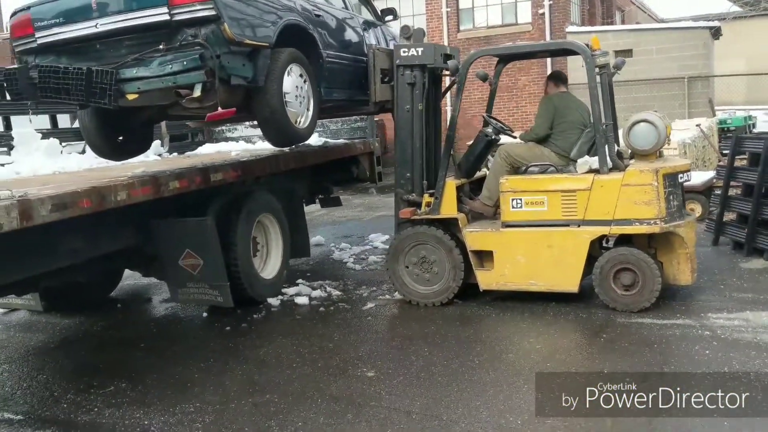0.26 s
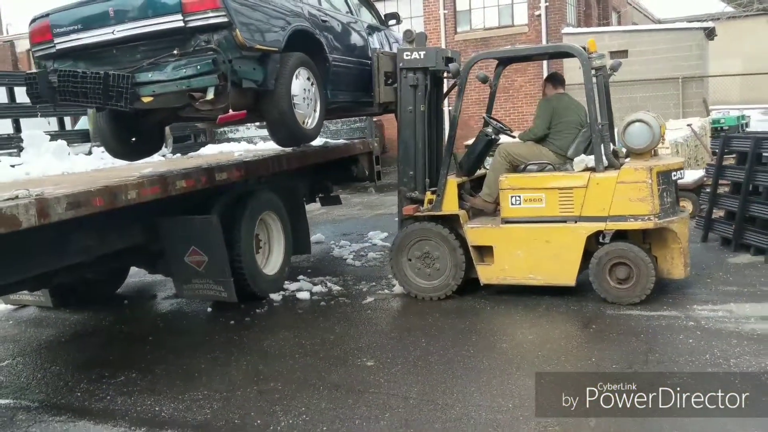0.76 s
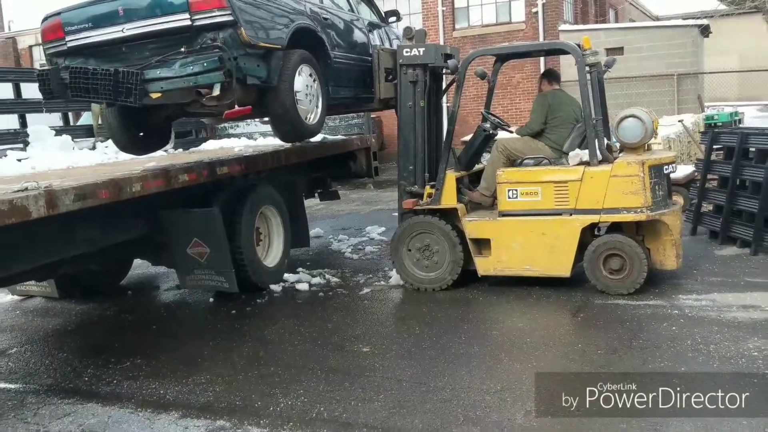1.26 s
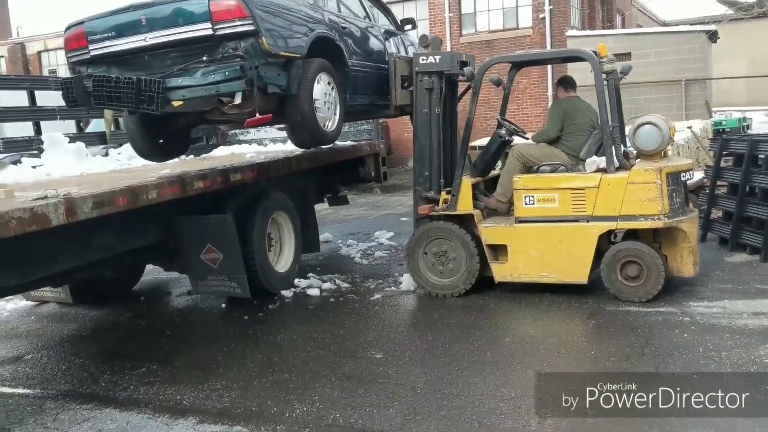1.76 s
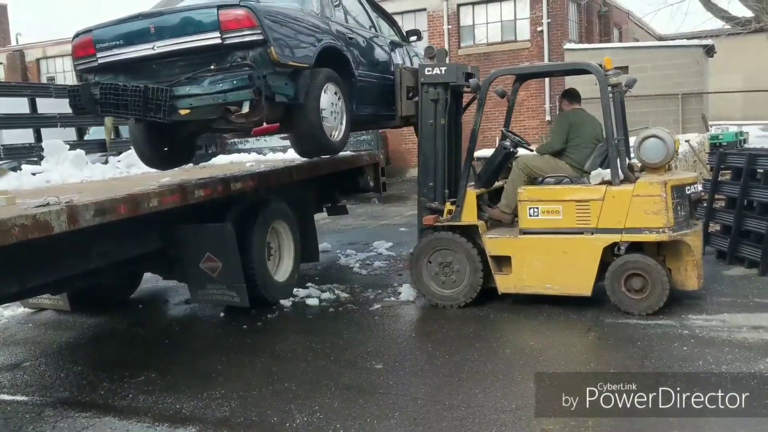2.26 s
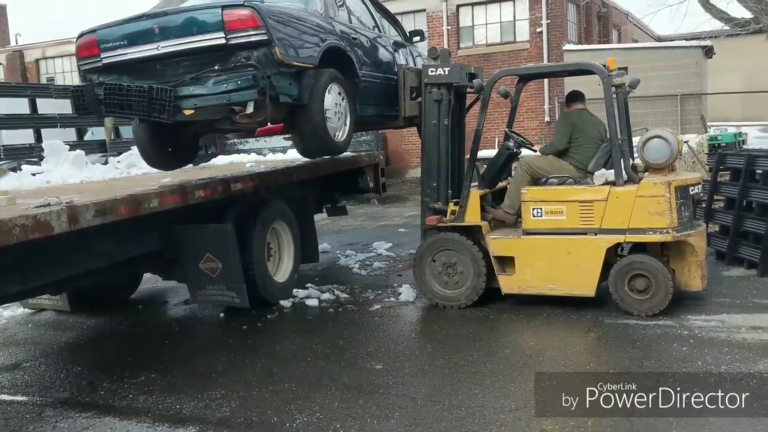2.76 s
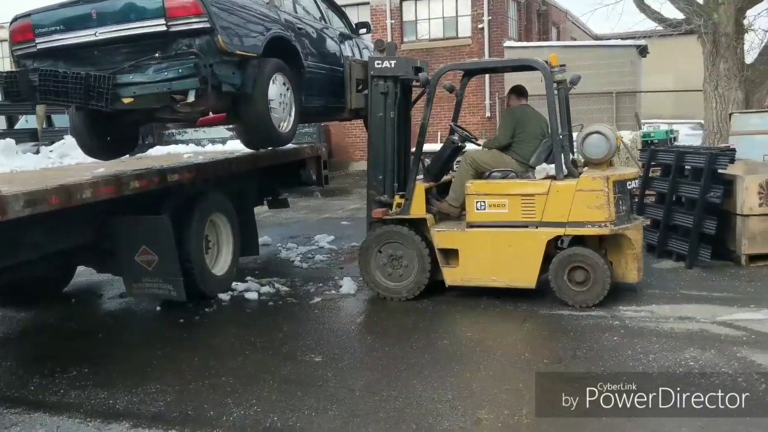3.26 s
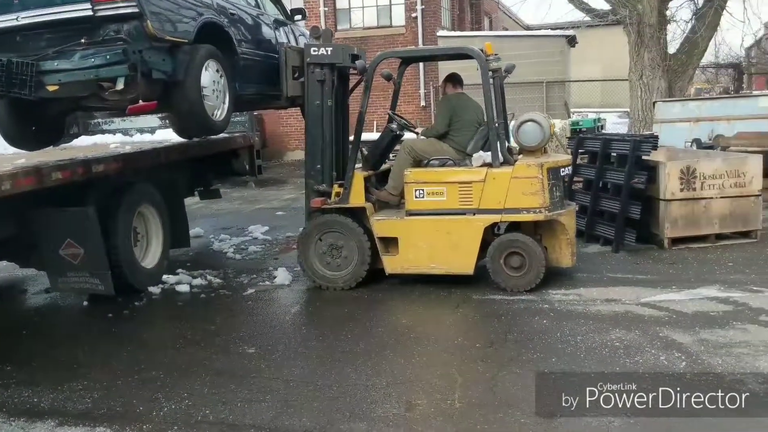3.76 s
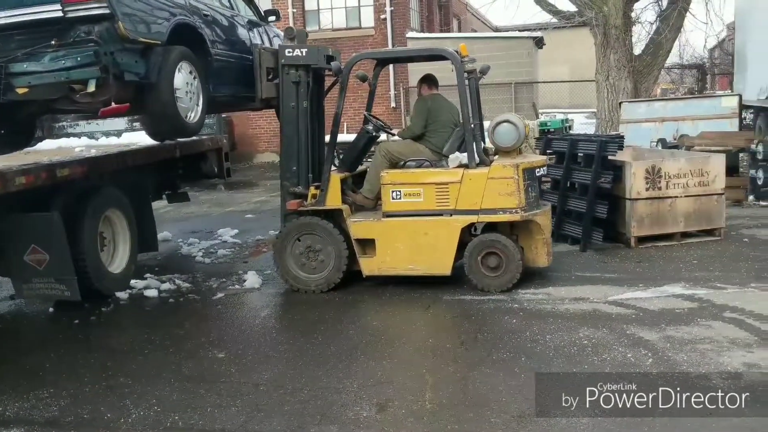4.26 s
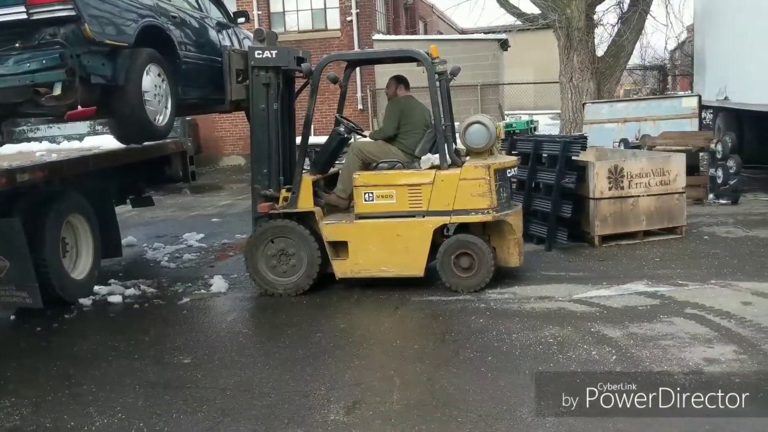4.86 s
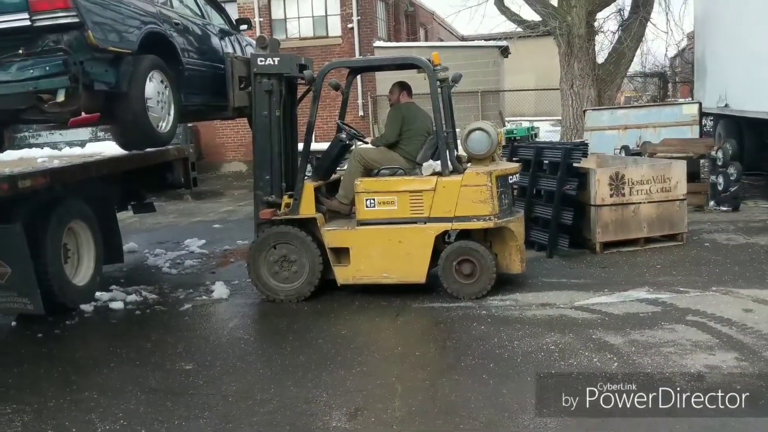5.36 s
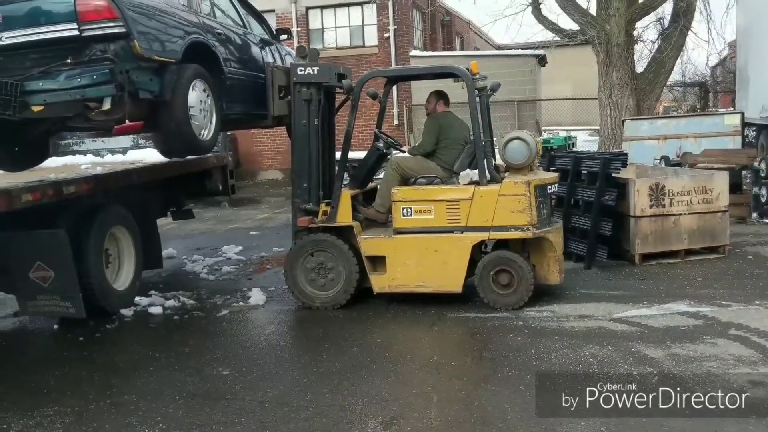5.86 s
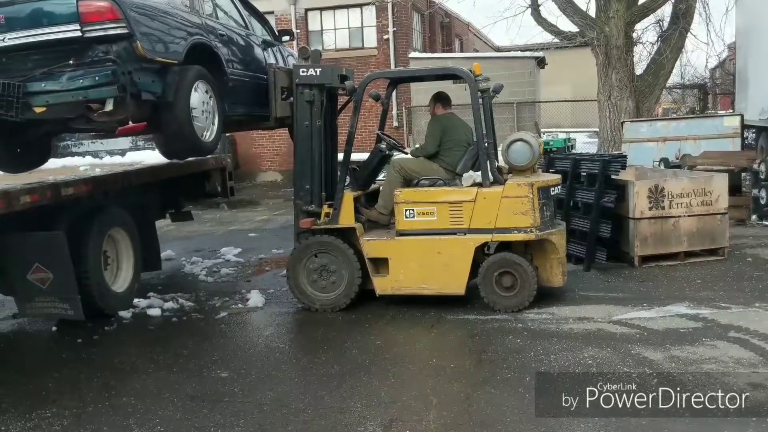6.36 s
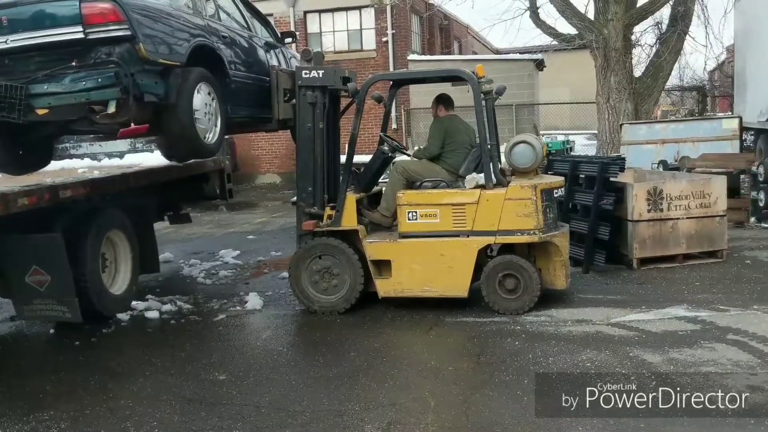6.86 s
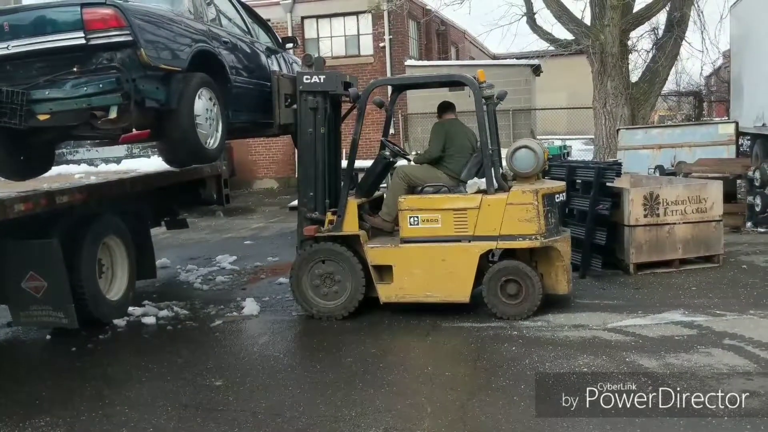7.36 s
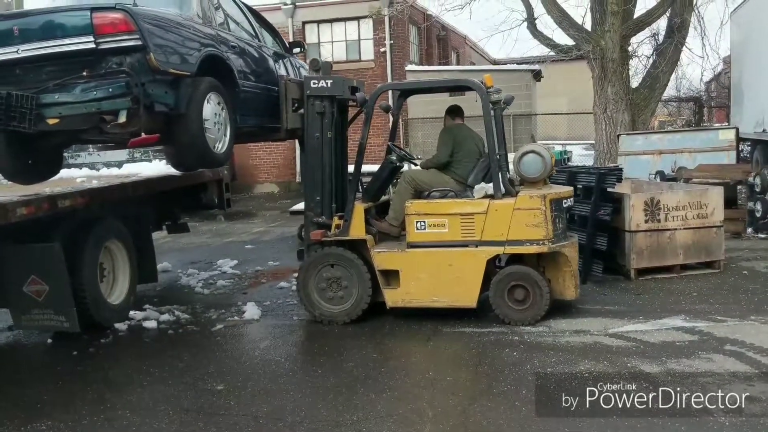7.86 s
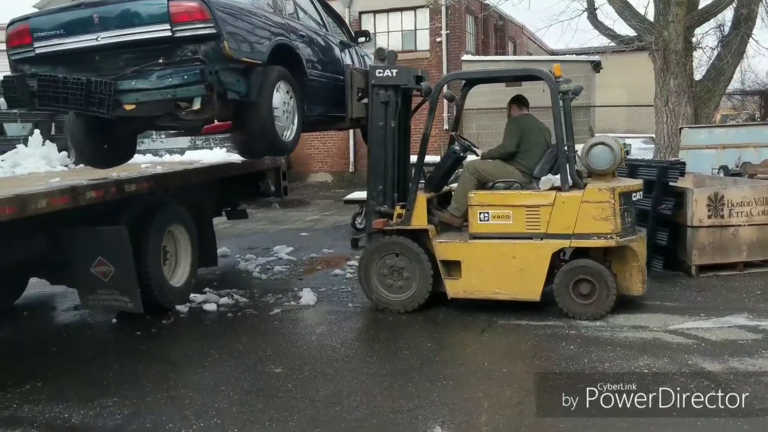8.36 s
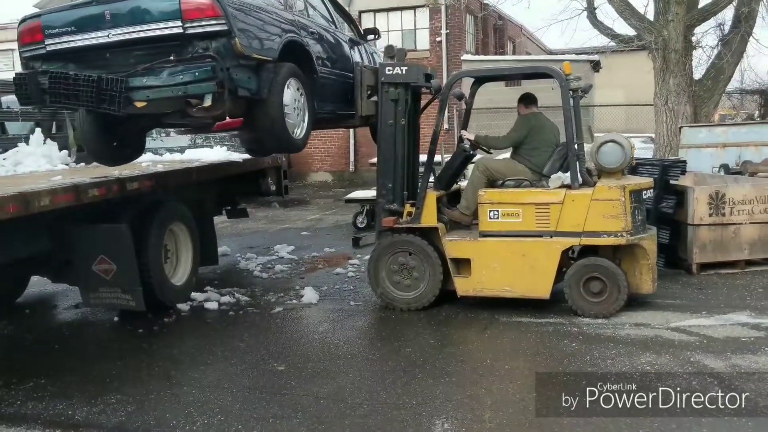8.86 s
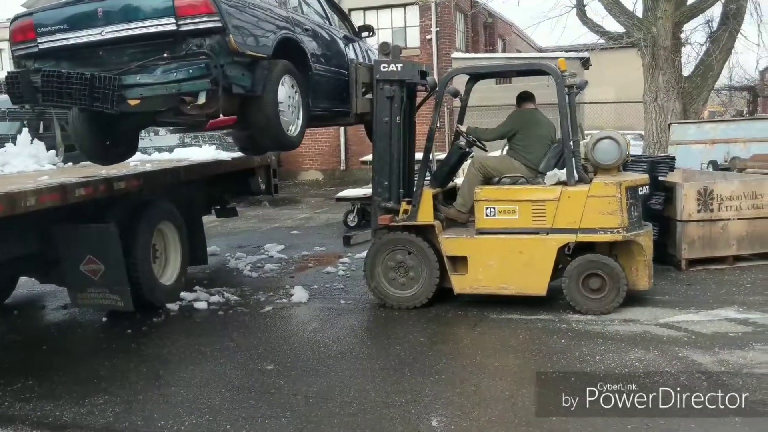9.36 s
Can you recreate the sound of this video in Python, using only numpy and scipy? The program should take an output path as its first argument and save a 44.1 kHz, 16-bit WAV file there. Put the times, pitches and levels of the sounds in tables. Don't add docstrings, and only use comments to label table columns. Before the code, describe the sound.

Two engines run continuously outdoors. The nearer forklift hunts up and down in speed under load, giving swelling bass hums, with the deepest sag around five seconds before it recovers and holds a fuller drone. An idling diesel truck rattles busily behind, repeating the same knocking pattern about six times a second. Short, dry metallic clinks come irregularly. The camera microphone hears short wall echoes and ducks slightly on loud swells.

```python
import sys
import numpy as np
from scipy import signal
from scipy.fft import rfft, irfft
from scipy.io import wavfile
from scipy.ndimage import uniform_filter1d, map_coordinates

SR = 44100
rng = np.random.default_rng(int(sys.argv[2]) if len(sys.argv) > 2 else 0)


def to_wav(sig):
    pcm = np.clip(np.atleast_2d(sig), -1, 1) * 32767
    pcm = np.round(pcm).astype(np.int16)
    wavfile.write(sys.argv[1], SR, pcm.T)


def field_ratio(decibels):
    return 10 ** (np.asarray(decibels, dtype=float) / 20)


N = 423359

# time_s, firing_hz, throttle_db
FORKLIFT_SPEED = [(0, 56.4, 5.5), (.21, 54.7, -1.5), (.64, 46.43, -0.5), (1.42, 55.05, 2),
                  (2.17, 46.82, -4.5), (2.95, 54.7, 3), (3.45, 49.6, -2.5), (4.03, 56.95, 1.5),
                  (4.6, 43.78, -5.5), (4.98, 39.77, -18), (5.6, 45.13, -1.5), (6.2, 59.9, 0.5),
                  (6.9, 54.57, 1.5), (7.52, 58.58, 0), (7.9, 58.36, -0.5), (8.35, 58.7, 0),
                  (9.22, 51.27, 2), (9.6, 54.3, 2.5)]
# freq_hz, gain_db
EXHAUST_PIPE = [(20, -58.5), (40, -29), (48, -15.5), (56, -2), (66, -4), (85, 3), (115, -13), (145, -15.5),
                (160, -2.5), (177, 7), (195, -4), (225, -12.5), (280, -19), (600, -90)]
# freq_hz, gain_db
MANIFOLD_TONE = [(20, -70), (45, -10), (72, 4), (90, -7), (105, 3.5), (125, 3.5), (150, 0), (175, -10),
                 (215, 0), (250, -7), (300, -15), (400, -29.5), (900, -75)]
CYLINDER_OFFSETS = [-0.36, -0.15, -0.12, -0.23]
# t60_s, level_db
WALL_ECHO = (0.19, -5.5)
# freq_hz, level_db_per_hz
DIESEL_BLOCK = [(160, -28.5), (280, -5), (412, -8.5), (576, -5), (806, -6), (1230, 0), (1600, -9.5),
                (1960, -11.5), (2530, -16.5), (3840, -17.5), (5560, -22), (6360, -21.5), (7270, -27.5),
                (8900, -26.5), (15500, -43)]
# freq_hz, width_hz,
# lift_db
PANEL_RESPONSE = [(584, 44, -3.5), (820, 24, -1.5), (1095, 63, -6), (1290, 85, -2.5), (1235, 73, -3.5),
                  (3280, 62, 3), (3870, 72, 4), (6430, 210, 5.5)]
# freq_hz, power_share
CYCLE_REPEAT = [(300, .25), (800, .65), (1050, .35), (1300, .35), (1500, .7), (2200, .55), (3500, .35),
                (6500, .15), (10000, .04)]
# freq_hz, power_share
FIRING_GATE = [(300, 0.052), (1200, 0.09), (2000, 0.93), (4000, 0.73), (12000, 1)]
CYLINDER_KNOCK = [-4.6, -3.6, -5, -1.7, -2, -3.5]
# cycle_multiple, level_db
DIESEL_ORDERS = [(6, -43.5), (12, -36), (42, -42), (54, -42), (72, -53), (120, -42.5), (135, -38),
                 (174, -38), (180, -45), (204, -77), (231, -43.5)]
# freq_hz, width_hz, level_db
LOOSE_PARTS = [(1942, 105, -40.5), (2303, 76, -48), (3390, 130, -50.5), (3800, 84, -48), (4750, 150, -56),
               (6186, 75, -49), (6570, 330, -51.5), (8650, 250, -60.5), (10730, 330, -57)]
# cycle_place (0-1), pitch_hz, peak_db, t60_s
VALVE_KNOCKS = [(.05, 1254, -20, .16), (.12, 1225, -18, .1), (.22, 1230, -19, .06), (.43, 1255, -18, .06),
                (.58, 1170, -18, .08), (.71, 1260, -20, .08), (.78, 1225, -18, .07), (.53, 1040, -23, .06),
                (.66, 1110, -21, .05), (.70, 1410, -21, .06), (.53, 1820, -25, .07), (.70, 3760, -31, .09)]
# start_s, peak_db
BRACKET_HITS = [(0.9342, -16), (1.2373, -18), (2.2388, -19), (2.5637, -19), (3.1904, -25), (3.2176, -8.5),
                (3.5404, -13), (4.1919, -16), (4.5171, -33), (5.006, -16), (5.0883, -27), (5.6853, -28),
                (5.9815, -22), (6.9562, -14), (7.2814, -15), (7.9643, -15), (8.2352, -45), (8.5869, -12)]
# pitch_hz, level_db, t60_s
BRACKET_MODES = [(6180, 14, 0.03), (6830, 11, 0.029), (3870, 12.5, 0.027), (4630, -16, 0.036),
                 (2040, 10, 0.054)]
# freq_hz, level_db_per_hz
YARD_RUMBLE = [(12, -42), (20, -15), (59, -11), (156, 3), (214, 4), (271, -15.5), (344, -5), (400, -19.5),
               (520, -58), (880, -120)]

HAPPY_HZ = 53
GOVERNOR_DB_PER_HZ_S = 0.0938
OVERRUN_DB_PER_HZ_S = 0.02
LOPE_DB, LOPE_DB_PER_HZ, LOPE_FLUTTER_DB = -2, 0.21, 0.64
TRUCK_CYCLE_HZ, TRUCK_START_S = 6.1458, .007
VALVE_SCATTER_DB = 1.0
AGC_LEVEL_DB, AGC_SHARE = -17.5, 0.52
AGC_LAG_S, AGC_RELEASE_S = 0.19, 0.08


def forklift():
    firing_hz, throttle_db = eased(FORKLIFT_SPEED)
    climb = np.gradient(firing_hz) * SR
    overrun_db = OVERRUN_DB_PER_HZ_S * np.clip(climb, None, 0)
    push_db = throttle_db + GOVERNOR_DB_PER_HZ_S * climb + overrun_db
    uneven_db = LOPE_DB + overrun_db + LOPE_DB_PER_HZ * (firing_hz - HAPPY_HZ)
    uneven_db += LOPE_FLUTTER_DB * wobble(4.5)
    count = np.cumsum(firing_hz) / SR
    at = np.flatnonzero(np.diff(np.floor(count)))
    k = np.arange(len(at))
    chance = rng.standard_normal((len(at), 3))
    sag = np.clip(HAPPY_HZ - firing_hz[at], 0, None)
    delay_s = (.0003 + .00007 * sag) * chance[:, 2]
    late = np.clip(at + np.round(SR * delay_s).astype(int), 0, N - 1)

    even, uneven = np.zeros(N), np.zeros(N)
    even[at] = field_ratio(push_db[at] - .9 * sag + .8 * chance[:, 0]) / firing_hz[at]
    sizes = 2 * (k % 2) + np.take(CYLINDER_OFFSETS, k % 4)
    sizes += (0.47 + 0.038 * sag) * chance[:, 1]
    uneven[late] = field_ratio(uneven_db[at]) * sizes / firing_hz[at]
    boom = filtered(even, lambda hz: field_ratio(along(EXHAUST_PIPE, hz)))
    lope = off_walls(filtered(uneven, lambda hz: field_ratio(along(MANIFOLD_TONE, hz))))
    return SR / 2 * (field_ratio(-18) * boom + field_ratio(-26) * lope)


def off_walls(x):
    t60_s, level_db = WALL_ECHO
    t = np.arange(SR // 2) / SR
    tail = rng.standard_normal(len(t)) * field_ratio(-60 * t / t60_s)
    return x + field_ratio(level_db) * signal.fftconvolve(x, tail / np.linalg.norm(tail))[:N]


def bracket():
    out = np.zeros(N + SR)
    t = np.arange(SR // 8) / SR
    attack = 1 - np.exp(-t / 0.0031)
    for start_s, peak_db in BRACKET_HITS:
        ring = np.zeros(len(t))
        for hz, level_db, t60_s in BRACKET_MODES:
            envelope = field_ratio(level_db + rng.normal(0, 2) - 60 * t / t60_s)
            ring += envelope * np.sin(2 * np.pi * hz * (1 + rng.normal(0, 0.018)) * t)
        out[round(start_s * SR):][:len(t)] += field_ratio(peak_db - 19.5) * ring * attack
    return out[:N]


def truck():
    cycle = (np.arange(N) / SR - TRUCK_START_S) * TRUCK_CYCLE_HZ + .0012 * wobble(1.5) + 1
    firing = np.floor(6 * cycle).astype(int)
    since_s = (6 * cycle - firing) / (6 * TRUCK_CYCLE_HZ)
    luck = np.clip(rng.standard_normal((firing.max() + 1, 1 + len(LOOSE_PARTS))), -2, 2)
    knock_db = np.take(CYLINDER_KNOCK, firing % 6)
    burst = (1 - np.exp(-since_s / 0.0065)) * field_ratio(-60 * since_s / 0.077)
    out = field_ratio(-24.5) * unit(clatter(cycle, burst, knock_db + 2.3 * luck[firing, 0]))
    out += valves(cycle)
    for order, level_db in DIESEL_ORDERS:
        phase = 2 * np.pi * order * cycle + .7 * wobble(5)
        out += field_ratio(level_db + 3 + 1.8 * wobble(4)) * np.sin(phase)
    for j, (hz, width_hz, level_db) in enumerate(LOOSE_PARTS):
        shake = rng.standard_normal(N) * burst * field_ratio(2 * knock_db + 4.8 * luck[firing, 1 + j])
        rattle = signal.lfilter(*signal.iirpeak(hz, hz / width_hz, SR), shake)
        out += field_ratio(level_db) * unit(rattle)
    return out


def clatter(cycle, burst, strength_db):
    bursts = unit(patchy(rng.standard_normal(N), depth_db=2.5) * (1 + 2.4 * field_ratio(strength_db) * burst))
    wash = rng.standard_normal(N)
    size = int(SR / TRUCK_CYCLE_HZ)
    patterns = rng.standard_normal((2, size))
    where = (cycle % 1 * size).astype(int)
    drift = 0.15 * wobble(0.5)
    pattern = np.cos(drift) * patterns[0, where] + np.sin(drift) * patterns[1, where]
    same = unit(pattern * (1 + 2.6 * burst))

    def colour(hz):
        lift_db = sum(db / (1 + (2 * (hz - c) / w) ** 2) for c, w, db in PANEL_RESPONSE)
        return field_ratio(along(DIESEL_BLOCK, hz) + lift_db)

    def alike(hz):
        return np.clip(along(CYCLE_REPEAT, hz), .001, .999)

    def gated(hz):
        return np.clip(along(FIRING_GATE, hz), .001, .999)

    body = filtered(bursts, lambda hz: colour(hz) * np.sqrt((1 - alike(hz)) * gated(hz)))
    body += filtered(wash, lambda hz: colour(hz) * np.sqrt((1 - alike(hz)) * (1 - gated(hz))))
    body += filtered(same, lambda hz: colour(hz) * np.sqrt(alike(hz)))
    return body


def valves(cycle):
    out = np.zeros(N)
    for place, hz, peak_db, t60_s in VALVE_KNOCKS:
        since_s = (cycle - place) % 1 / TRUCK_CYCLE_HZ
        luck = rng.standard_normal(int(cycle[-1]) + 2)[np.floor(cycle - place).astype(int)]
        envelope = field_ratio(peak_db + VALVE_SCATTER_DB * luck - 60 * since_s / t60_s)
        attack = 1 - np.exp(-since_s / 0.0057)
        out += envelope * attack * np.sin(2 * np.pi * hz * since_s)
    return out


def yard():
    def tone(hz):
        return field_ratio(along(YARD_RUMBLE, hz)) * hz ** 2 / (hz ** 2 + 45 ** 2)
    noise = filtered(rng.standard_normal(N), tone)
    return field_ratio(-30 + 1.9 * wobble(6.5)) * unit(noise)


def unit(x):
    return x / np.sqrt(np.mean(x ** 2) + 1e-20)


def along(points, hz):
    f, v = np.transpose(points)
    return np.interp(np.log(hz + 1), np.log(f + 1), v)


def wobble(rate):
    coarse = np.arange(0, N + 64, 64)
    knots = rng.standard_normal(int(N * rate / SR) + 4)
    return np.interp(np.arange(N), coarse, map_coordinates(knots, [coarse * rate / SR]))


def filtered(x, gain):
    m = 2 ** 19
    cepstrum = irfft(np.log(gain(np.fft.rfftfreq(m, 1 / SR)) + 1e-6), m)
    cepstrum[1:m // 2] *= 2
    cepstrum[m // 2 + 1:] = 0
    return irfft(rfft(x, m) * np.exp(rfft(cepstrum)), m)[:N]


def patchy(x, depth_db):
    z = signal.stft(x, nperseg=256)[2]
    field = uniform_filter1d(rng.standard_normal(z.shape), size=3, axis=0)
    field = uniform_filter1d(field, size=8, axis=1)
    return signal.istft(z * field_ratio(depth_db * unit(field)), nperseg=256)[1][:N]


def eased(rows):
    s, *cols = np.transpose(rows)
    t = np.arange(N) / SR
    k = np.clip(np.searchsorted(s, t) - 1, 0, len(s) - 2)
    span = np.diff(s)[k]
    u = (t - s[k]) / span
    out = []
    for v in cols:
        d = np.diff(v) / np.diff(s)
        onward = np.clip(d[:-1] * d[1:], 0, None)
        slope = np.r_[d[0], 2 * onward / (d[:-1] + d[1:] + 1e-9), d[-1]]
        glide = v[k] + (v[k + 1] - v[k]) * u * u * (3 - 2 * u)
        bend = span * u * (1 - u) * ((1 - u) * slope[k] - u * slope[k + 1])
        out.append(glide + bend)
    return out


def scene():
    return (forklift() + bracket() + truck() + yard())[None]


def gain_control(x):
    def follow(lag_s):
        keep = np.exp(-1 / (lag_s * SR))
        return signal.lfilter([1 - keep], [1, -keep], x ** 2, zi=[[field_ratio(2 * AGC_LEVEL_DB)]])[0]
    power = np.minimum(follow(AGC_LAG_S), follow(AGC_RELEASE_S))
    power = uniform_filter1d(power, size=2000, mode="nearest")
    return x * field_ratio(-AGC_SHARE * (10 * np.log10(power) - AGC_LEVEL_DB))


def roll_off(x):
    return signal.sosfilt(signal.butter(12, 15630, fs=SR, output="sos"), x)


def record(dry):
    x = gain_control(dry)
    x = x / (1 + np.abs(x / .8) ** 4) ** (1 / 4)
    return roll_off(x)


dry = scene()
out = record(dry)
to_wav(out)
```